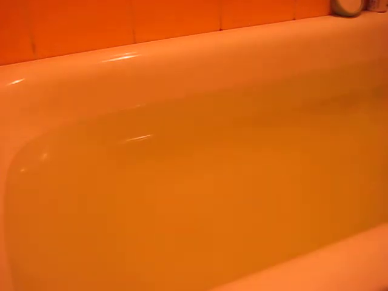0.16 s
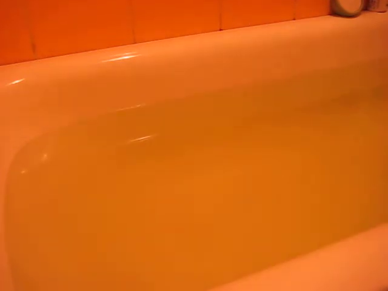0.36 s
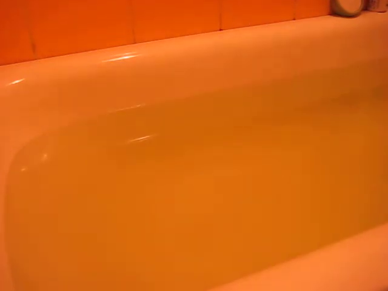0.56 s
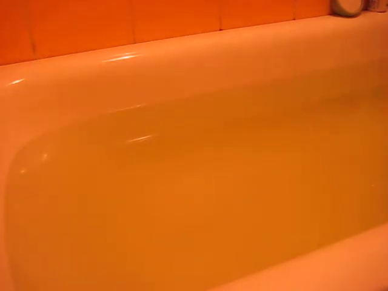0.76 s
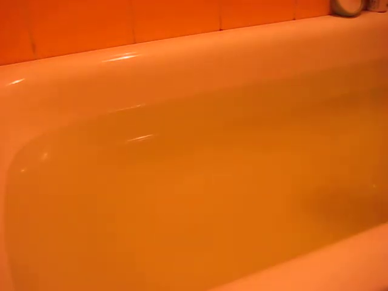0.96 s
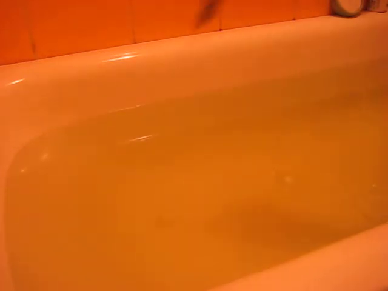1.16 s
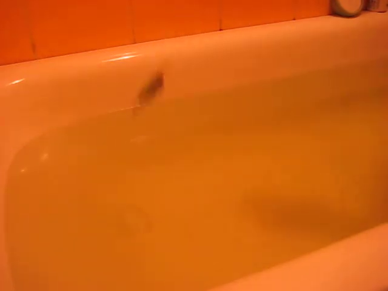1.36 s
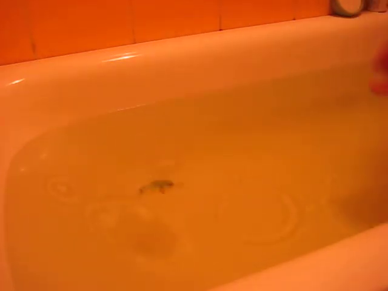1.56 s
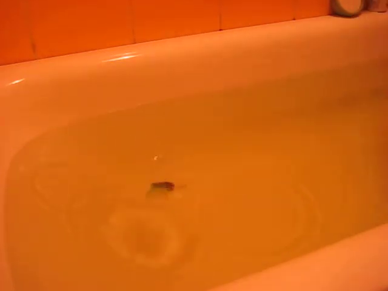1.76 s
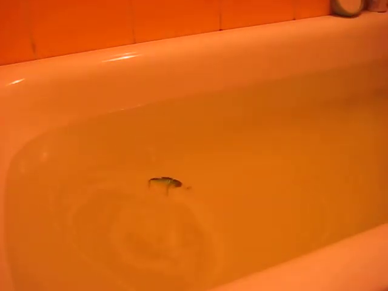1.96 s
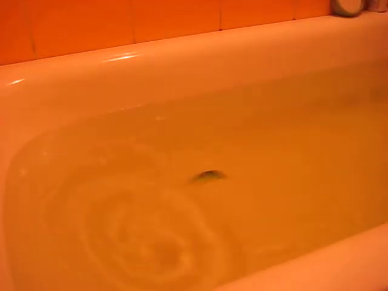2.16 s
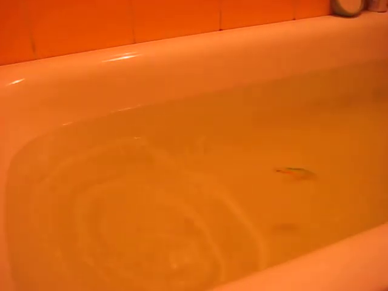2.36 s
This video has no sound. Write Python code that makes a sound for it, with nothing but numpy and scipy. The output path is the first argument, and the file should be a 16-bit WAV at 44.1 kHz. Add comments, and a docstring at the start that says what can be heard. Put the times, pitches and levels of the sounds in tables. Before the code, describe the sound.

A small splash in a filled bathtub. Fishing tackle first clicks and rattles, a lure swishes softly and hits the water, then drops plip and bubbles rise. The microphone is close, in a tiled bathroom with steady hiss.

```python
"""A tiled bathroom, one microphone close to a filled bathtub.
First the fishing tackle clicks and rattles, then the small lure swishes over the tub.
At 1.45 s it lands: a short splash of slaps, ringing bubbles and fine spray. From 2 s it is tugged:
drops plip, bubbles rise, and the tackle clinks once more. Tub walls and tiles answer clicks and water.
A steady hiss, a low hum and a faint high whine lie under it all."""
import sys
import numpy as np
from scipy import signal
from scipy.fft import rfft, irfft, next_fast_len
from scipy.io import wavfile

SR = 44100
rng = np.random.default_rng(int(sys.argv[2]) if len(sys.argv) > 2 else 0)


def wrap_up_sound(samples):
    """Save the sound to the file named by the first command line argument, as 16-bit audio."""
    columns = np.atleast_2d(samples).T
    # keep every value between -1 and 1, then stretch to whole-number steps
    tamed = np.clip(columns, -1, 1)
    steps = np.round(tamed * 32767).astype(np.int16)
    wavfile.write(sys.argv[1], SR, steps)


N = 105840
TOP_HZ = 15800  # upper limit of the spray and of the microphone

# Slaps on the surface: start_s, ring_db, pitch_hz, sharpness_q, crack_db, crack_top_hz
SURFACE_SLAPS = [(1.4513, -7.5, 8950, 1.9, -12, 14000), (1.4535, 2.5, 3620, 7.3, -1.5, 14000),
                 (1.458, -5, 1500, 5.2, -2.5, 12100), (1.482, -1.5, 3600, 4.1, -10, 7000),
                 (1.4818, -4.5, 1900, 2.1, -20, 5000), (1.5028, 2, 2420, 5.4, -1, 5740),
                 (1.5032, -3.5, 3700, 4.8, -7, 11100), (1.5215, -9, 1127, 9.3, -6, 13000),
                 (1.5268, -4, 3300, 12, 0.5, 7700)]
def splash():
    """Lure and water slap the surface close to the microphone; these are the driest hits."""
    return contacts(SURFACE_SLAPS, crack_s=0.0031, room_db=-1)


# Drops and plops, and one early low knock: start_s, ring_db, pitch_hz, sharpness_q, crack_db, crack_top_hz
WATER_DROPS = [(.333, -22, 694, 4.1, -36, 1500), (1.708, -27, 3420, 10, -45, 5000),
               (1.837, -24.5, 5330, 24, -48, 6030), (2.0633, -6.5, 4560, 5.2, -9.5, 12400),
               (2.0672, -7.5, 3470, 7.2, -9, 12200), (2.104, -16, 3400, 3, -17, 12000),
               (2.115, -13, 1840, 3.3, -29, 6000), (2.1365, -8.5, 1790, 2.1, -21, 5500),
               (2.137, -13, 3700, 15, -37, 6000), (2.2595, -18.5, 1980, 12, -34, 4000),
               (2.26, -21, 3450, 27, -50, 4000)]
def drops():
    """Single drops hit the bathwater with a short plip; the first row, at 0.333 s, is a low dull knock before
    anything touches the water."""
    return contacts(WATER_DROPS, crack_s=0.0048, room_db=1)


# Big bubbles: start_s, level_db, start_pitch_hz, t60_s
BIG_BUBBLES = [(1.455, -15, 1122, .04), (1.467, -8, 1750, 0.035), (1.482, -10, 1426, 0.035),
               (1.504, -9.5, 2280, .04), (2.099, -18.5, 956, 0.019), (2.124, -21, 1085, 0.033),
               (2.138, -14, 1408, 0.026), (2.148, -17.5, 1150, 0.026), (2.159, -17.5, 1405, 0.047),
               (2.269, -16, 1260, 0.042), (2.281, -20, 1376, 0.022), (2.305, -23, 1410, 0.021)]
def bubbles(froth_count=6, froth_db=-14.5, froth_cycles=16):
    """Each big bubble sheds a froth of smaller, higher ones."""
    out = np.zeros(N)
    for start_s, level_db, pitch_hz, t60_s in BIG_BUBBLES:
        plop = bubble(pitch_hz, t60_s)
        delays_s = rng.exponential(0.009, froth_count)
        froth_hz = pitch_hz * 1.424 * np.exp(0.22 * rng.standard_normal(froth_count))
        for delay_s, hz in zip(delays_s, froth_hz):
            add(plop, delay_s, amp(froth_db) * bubble(hz, froth_cycles / hz))
        add(out, start_s, bathroom(amp(level_db) * plop))
    return out


def bubble(pitch_hz, t60_s, rise_per_s=4, attack_s=0.0013):
    """Trapped air rings and rises in pitch as it nears the surface."""
    t = np.arange(SR // 8) / SR
    tone = np.sin(2 * np.pi * pitch_hz * (t + rise_per_s * t ** 2 / 2))
    return packet(tone * amp(-60 * t / t60_s) * (1 - np.exp(-t / attack_s)))


# Clicks of the tackle: start_s, ring_db, pitch_hz, sharpness_q, crack_db, crack_top_hz
TACKLE_CLICKS = [(.0985, -19.5, 1330, 0.71, -13.5, 9400), (.2316, -7, 10900, 5.8, -24, 14000),
                 (.2337, -10, 6040, 6.6, -29, 15000), (.2372, -4.5, 6300, 4.6, -29, 10000),
                 (.2606, 6, 3090, 7.6, -8.5, 7500), (.2642, 2.5, 2846, 23, -22, 7000),
                 (.274, 0, 3030, 33, -28, 6000), (.288, -0.5, 2810, 11, -22, 6000),
                 (.2993, -4.5, 9400, 4.1, -26, 14000), (.3005, -11, 3070, 9.2, -7.5, 6000),
                 (.312, -11.5, 2020, 18, -20, 6000), (.314, -7, 3100, 23, -15, 6000),
                 (.3695, -12, 6050, 39, -14, 6000), (.366, -9.5, 3055, 50, -13, 5000),
                 (.373, -10, 1850, 7.1, -32, 4950), (.383, -12.5, 1650, 6.7, -32, 4000),
                 (.386, -13.5, 8760, 12, -12.5, 8900), (.5055, -15, 9700, 8.5, -16.5, 9000),
                 (.537, -15.5, 7830, 25, -28, 13700), (.580, -16.5, 13200, 12, -24.5, 8900),
                 (.655, -22, 11100, 21, -32, 9000), (1.007, -32, 11000, 3, -29, 9000),
                 (2.381, -14.5, 5300, 24, -22, 8100), (2.381, -19, 2590, 80, -24, 5000),
                 (2.384, -20.5, 4020, 87, -36, 5000), (2.383, -12, 6470, 22, -21, 7000)]
def tackle():
    """Small hard parts of the tackle knock together and clink."""
    return contacts(TACKLE_CLICKS, crack_s=0.0037, room_db=1.6)


# Spectrum of a contact's crack: frequency_hz, gain_db
CRACK_SPECTRUM = [(200, -59), (700, -15), (1100, -12.5), (2000, -3), (4000, 2), (6500, 1.5), (10000, 0.5),
                  (13000, -0.5), (16000, -3)]
def contacts(rows, crack_s, room_db, size=2048):
    """Each contact is one quickly damped resonance and a broad crack that fades over crack_s."""
    out = np.zeros(N)
    f = np.fft.rfftfreq(size, 1 / SR) + 1
    for start_s, ring_db, pitch_hz, q, crack_db, crack_top_hz in rows:
        ratio = f / pitch_hz
        resonance = band(ratio, 0.62, 1.63) / np.hypot(1, q * (ratio - 1 / ratio))
        ring = packet(pulse(resonance))
        colour = pulse(amp(along(CRACK_SPECTRUM, f)) * band(f, 0.29 * pitch_hz, crack_top_hz))
        crack = packet(signal.fftconvolve(colour, burst(crack_s))[:size])
        add(out, start_s, bathroom(amp(ring_db) * ring + amp(crack_db) * crack, room_db))
    return out


# Showers of ticks: start_s, hold_s, level_db, pitch_hz, low_edge_hz
TICK_SHOWERS = [(0.113, 0.046, -54.5, 3130, 1430), (0.219, 0.071, -48.5, 3900, 1480),
                (0.309, 0.0077, -37.5, 3300, 1880), (.385, 0.022, -41, 1820, 1550),
                (0.476, 0.1, -56, 1770, 1320), (0.443, 0.088, -48.5, 8400, 3930),
                (1.45, 0.022, -30, 5100, 1440), (1.522, 0.013, -33.5, 4500, 1390),
                (2.052, 0.018, -49, 9900, 4870), (2.268, 0.034, -56.5, 1920, 1600),
                (2.326, 0.02, -50, 9000, 6600), (2.377, 0.02, -41, 6100, 4000)]
def spray_and_rattle(ticks_per_s=2500, tick_cycles=4, release_s=0.024, size=256, count=800):
    """Fine droplets or rattling hooks: dense ticks of random pitch that hold briefly and die away."""
    out = np.zeros(N)
    t, tick_t = np.arange(SR // 4) / SR, np.arange(size) / SR
    for start_s, hold_s, level_db, pitch_hz, low_edge_hz in TICK_SHOWERS:
        onsets_s = np.cumsum(rng.exponential(1 / ticks_per_s, (count, 1)), axis=0)
        tick_hz = np.minimum(pitch_hz * np.exp(0.56 * rng.standard_normal((count, 1))), SR / 2)
        scatter_db = 4.5 * np.minimum(rng.exponential(1, (count, 1)), 4)
        cycles = tick_t * tick_hz
        ticks = np.sin(2 * np.pi * cycles) * amp(scatter_db - 60 * cycles / tick_cycles)
        positions = (onsets_s * SR).astype(int) + np.arange(size)
        shower = np.bincount(positions.ravel(), ticks.ravel(), len(t))[:len(t)]
        shower = filtered(shower, lambda f: band(f + 1, low_edge_hz, TOP_HZ))
        envelope = np.exp(-np.maximum(t - hold_s, 0) / release_s)
        add(out, start_s, bathroom(amp(level_db) * unit(shower) * envelope))
    return out


# Spectrum of the swing: frequency_hz, gain_db
SWISH_SPECTRUM = [(500, -31), (1500, -2), (2900, 3.5), (5500, 0), (8000, -5.5), (12000, -9), (16000, -24)]
def swish(peak_s=0.766, rise_s=0.05, fall_s=0.097, level_db=-40.5):
    """A soft swish as the lure is swung over the tub."""
    t = np.arange(N) / SR - peak_s
    envelope = np.exp(np.minimum(t / rise_s, -t / fall_s))
    return amp(level_db) * envelope * noise(lambda f: amp(along(SWISH_SPECTRUM, f)))


# Resonances of the tub: pitch_hz, width_hz, gain_db
TUB_MODES = [(1104, 36, -2), (1462, 9.2, 3), (1864, 13, 0.5), (2307, 24, 1.5), (2810, 19, 1),
             (2963, 50, -1), (3080, 25, -4), (3460, 22, -10), (4060, 19, -3)]
def tub(f):
    """Gain at frequency f: the tub favours its own resonances."""
    return 1 + sum(amp(db) * 1j * f * width / (hz ** 2 - f ** 2 + 1j * f * width)
                   for hz, width, db in TUB_MODES)


# Echoes off the tub walls: delay_s, level_db
WALL_ECHOES = [(.0012, -3.5), (.0037, -8.5), (.0048, -11.5), (0.013, -14)]
# Decay of the tiled room: frequency_hz, t60_s
TILE_DECAY = [(300, 0.92), (1500, 0.28), (3000, 0.27), (7000, 0.32), (14000, 0.3)]
def bathroom(x, room_db=2.05, onset_s=0.0024):
    """The microphone hears the direct sound, smeared echoes off the curved tub, and the tiles' tail."""
    t = np.arange(SR // 2) / SR
    hz, frames_s, spectra = signal.stft(rng.standard_normal(len(t)), SR, nperseg=256)
    decay = amp(-60 * frames_s / along(TILE_DECAY, hz)[:, None])
    tail = signal.istft(spectra * decay, SR, nperseg=256)[1][:len(t)]
    response = amp(room_db) * packet(tail * (1 - np.exp(-t / onset_s)))
    response[0] += 1  # the direct path
    for delay_s, level_db in WALL_ECHOES:
        echo = burst(0.072 * delay_s)  # later echoes are more smeared
        arrival_s = delay_s * np.exp(0.06 * rng.standard_normal())
        add(response, arrival_s, amp(level_db) * echo)
    return signal.fftconvolve(x, response)


# Spectrum of the steady hiss: frequency_hz, gain_db
HISS_SPECTRUM = [(25, -11.5), (45, -9.5), (90, -5), (200, -7), (480, -5.5), (700, -8.5), (1200, -10),
                 (3000, -11), (5500, -12), (8000, -14), (10000, -18), (12700, -17), (14200, -9.5),
                 (15000, -21), (15700, -26.5)]
def room_tone():
    """Steady hiss with a low hum and a faint high whine."""
    hum = amp(-63.5) * narrow_noise(pitch_hz=55, width_hz=13)
    whine = amp(-61) * narrow_noise(pitch_hz=15145, width_hz=25)
    hiss = amp(-48) * noise(lambda f: amp(along(HISS_SPECTRUM, f)))
    return hiss + hum + whine


def amp(db):
    """Decibels to gain."""
    return 10 ** (np.asarray(db) / 20)


def unit(x):
    """Scale to rms 1."""
    return x / np.sqrt(np.mean(x ** 2) + 1e-20)


def packet(x):
    """Scale to energy 1."""
    return x / (np.linalg.norm(x) + 1e-12)


def along(points, hz):
    """Read (frequency_hz, value) points on a log frequency axis."""
    f, values = np.transpose(points)
    return np.interp(np.log(hz + 1), np.log(f + 1), values)


def add(out, start_s, x):
    """Mix x into out at start_s."""
    part = out[max(0, round(start_s * SR)):][:len(x)]
    part += x[:len(part)]


def band(f, low, high):
    """Gain of a band between two edges, the lower one steeper."""
    return 1 / np.sqrt((1 + (low / f) ** 10) * (1 + (f / high) ** 6))


def filtered(x, response):
    """Filter x by a gain given as a function of frequency."""
    size = next_fast_len(len(x) + SR // 2)
    return irfft(rfft(x, size) * response(np.fft.rfftfreq(size, 1 / SR)), size)[:len(x)]


def noise(response):
    """Coloured noise of rms 1."""
    return unit(filtered(rng.standard_normal(N), response))


def narrow_noise(pitch_hz, width_hz):
    """A wavering tone: noise in one narrow peak."""
    return noise(lambda f: 1 / (1 + (2 * (f - pitch_hz) / width_hz) ** 2))


def pulse(gain):
    """The shortest causal pulse with this magnitude spectrum."""
    cepstrum = irfft(np.log(np.maximum(gain, 1e-6)))
    cepstrum[1:] *= 2
    cepstrum[len(cepstrum) // 2:] = 0
    return irfft(np.exp(rfft(cepstrum)))


def burst(fade_s, size=1024):
    """A brief puff of noise with an even spectrum and energy 1."""
    fade = np.exp(-np.arange(size) / SR / fade_s)
    spectrum = rfft(rng.standard_normal(size) * fade)
    whitened = irfft(spectrum / (np.abs(spectrum) + 1e-12))
    return packet(whitened * np.sqrt(fade))


def scene():
    """At the tub's side, in mono: water and tackle coloured by the tub, then swish and room tone."""
    at_tub = splash() + drops() + bubbles() + tackle() + spray_and_rattle()
    return (filtered(at_tub, tub) + swish() + room_tone())[None]


# Response of the microphone: frequency_hz, gain_db
MIC_RESPONSE = [(11000, -1), (14000, -2), (15800, -2)]
def record(dry):
    """The camera's microphone dulls the top and keeps nothing above its band limit."""
    return np.array([filtered(x, lambda hz: amp(along(MIC_RESPONSE, hz)) * (hz < TOP_HZ)) for x in dry])


dry = scene()
out = record(dry)
wrap_up_sound(out)
```